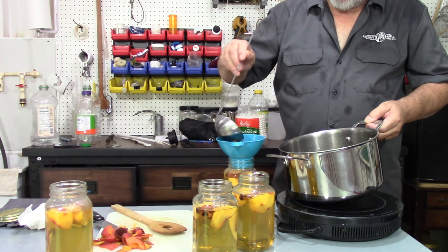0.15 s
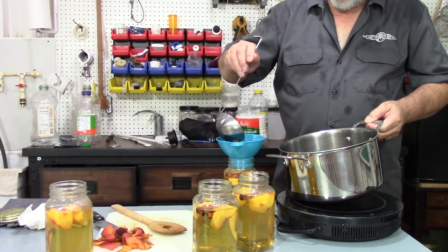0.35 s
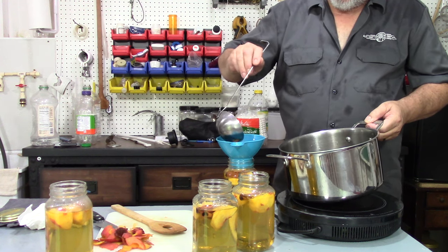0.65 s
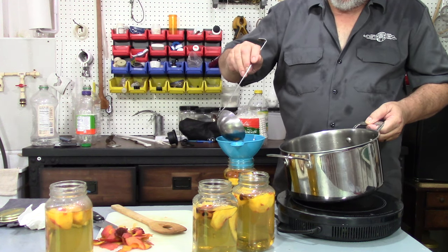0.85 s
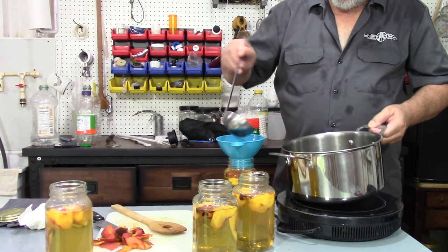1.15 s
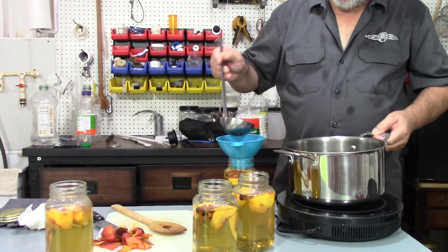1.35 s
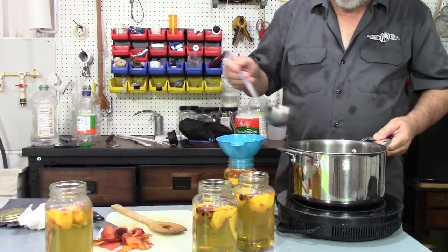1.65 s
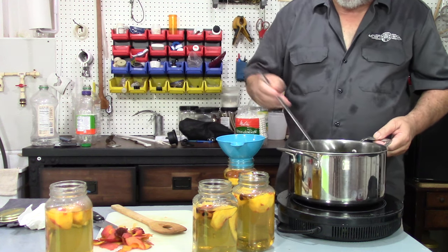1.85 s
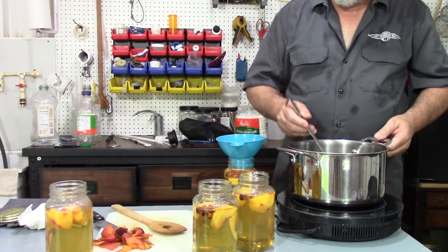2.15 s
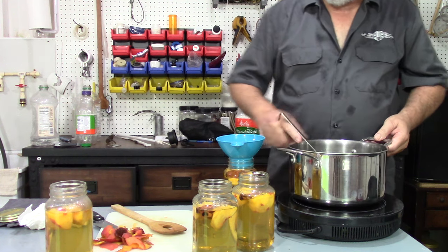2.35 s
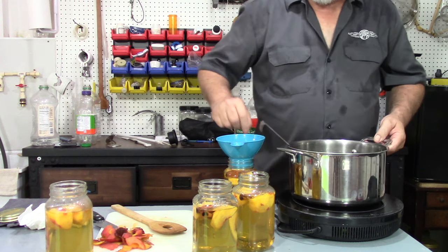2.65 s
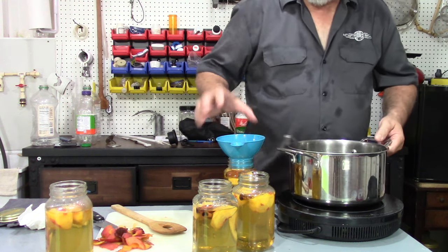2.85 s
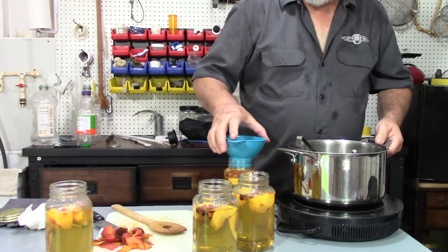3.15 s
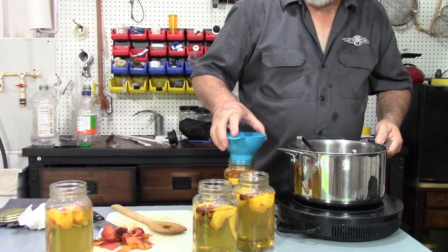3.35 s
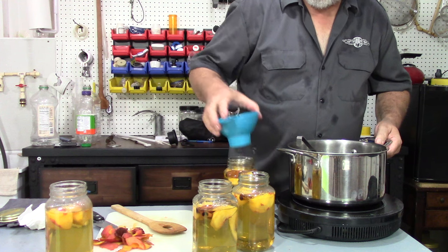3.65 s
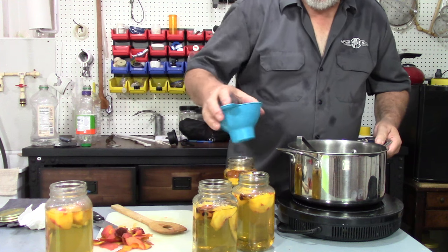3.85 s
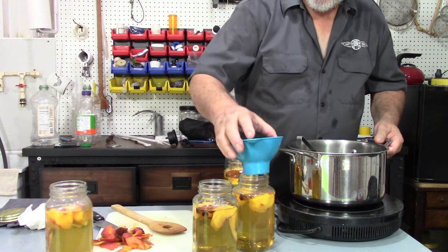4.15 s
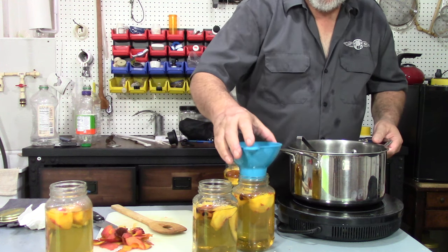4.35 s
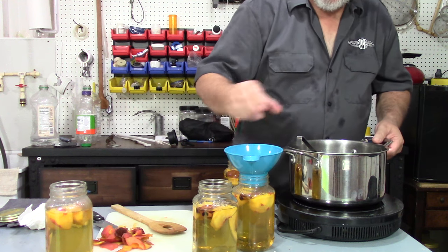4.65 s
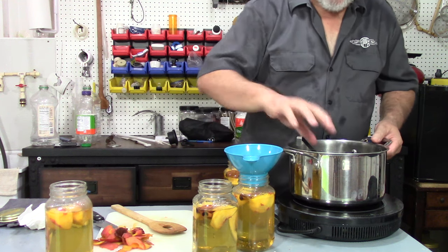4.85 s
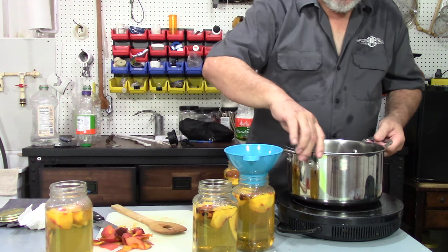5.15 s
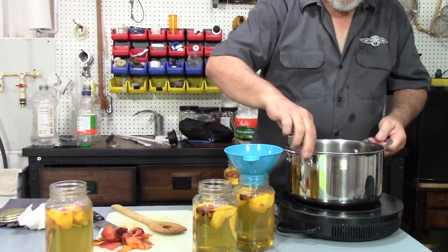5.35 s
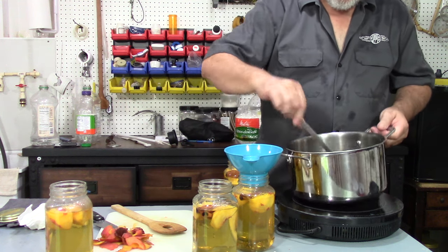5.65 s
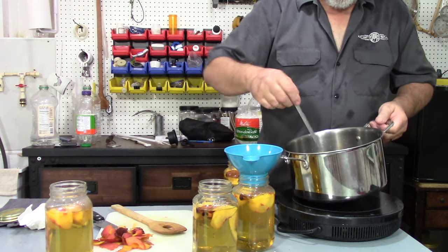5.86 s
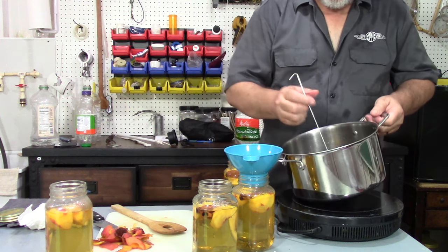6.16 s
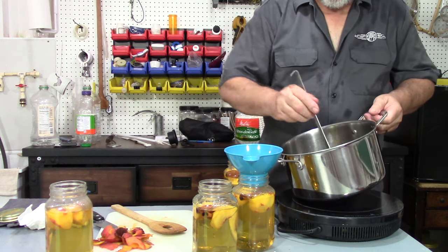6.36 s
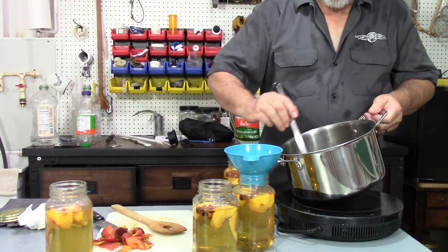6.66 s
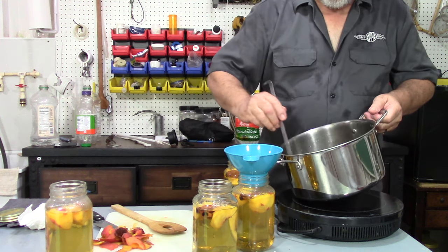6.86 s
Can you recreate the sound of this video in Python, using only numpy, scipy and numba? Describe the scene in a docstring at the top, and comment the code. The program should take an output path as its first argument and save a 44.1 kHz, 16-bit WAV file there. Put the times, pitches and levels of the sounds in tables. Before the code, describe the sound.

For the first two seconds, the last of a pour of syrup hisses and trickles faintly into a glass jar, with a few tiny metal ticks. At 2.1 seconds a steel pot is set down with a loud, ringing clang, the strongest sound. From 2.5 to 2.8 seconds a metal ladle drops in, clattering and scraping, then settles with a soft bump and tick by 3.4 seconds. At 4.1 seconds a funnel knocks hollowly on a jar's mouth, followed by four lighter taps until 4.5. After a short lull, the ladle scrapes grittily inside the pot from 5.3 seconds, clinking around 6 seconds, while the pot's ring rises slightly as it tips. A sharp clank comes at 6.4 seconds, with more clinks and scrapes from 6.7 to 7. Everything sounds close, in a small workshop with short reverberation and faint room tone.

```python
"""The last of a pour of syrup hisses away into a jar, whose glass and air sing under the splashes.
In a small workshop, the steel pot is set down; its ladle drops in, rocks and scrapes; a funnel knocks
on a jar's mouth. Then the pot is tipped and scooped: syrup leaving the wall lightens it and raises
most of its tones. Each blow is an impulse that sets damped modes ringing; scraping drives the same
modes with a gritty friction force. Faint room tone lies under it all."""
import sys
import numpy as np
from scipy import signal
from scipy.io import wavfile
from numba import njit

SR = 44100
rng = np.random.default_rng(int(sys.argv[2]) if len(sys.argv) > 2 else 0)


def transcribe(u):
    """Save the signal u as a 16-bit wav file named by the first command-line argument.

    u: samples, shape (n,) or (channels, n), limited to [-1, 1]; the rate is SR.
    q: integer samples, one column per channel.
    """
    v = np.clip(np.atleast_2d(u).T, -1, 1)
    q = np.round(v * 32767).astype(np.int16)
    wavfile.write(sys.argv[1], SR, q)


N = 309141

# blows on steel: t/s, tick level/dB, then level/dB at f/Hz = 170, 400, 1000, 2000, 4000, 8000
STEEL_BLOWS = [(0.122, -39, -63, -49, -53, -59.5, -54, -65), (0.417, -40, -61, -59, -63, -52, -66, -56),
               (0.896, -35.5, -63, -53, -63, -55.5, -61, -66), (1.499, -35.5, -55, -55, -72, -60, -57, -59),
               (2.104, 9, -46, -9.5, -16.5, -29.5, -29.5, -23),
               (2.531, -10, -60, -26, -18, -30, -12.5, -16), (2.68, -10, -52, -36, -21, -36, -19.5, -21.5),
               (2.786, -7, -45, -26.5, -25, -17.5, -14.5, -14),
               (3.021, -15, -20, -49.5, -46, -47, -51, -51), (3.289, -29, -52, -53, -46.5, -69, -75, -65.5),
               (5.332, -43.5, -44.5, -66, -65, -56, -54.5, -66), (5.946, -14, -58, -35, -59, -53, -38, -43),
               (6.093, -19, -53, -63, -51, -59, -36.5, -42), (6.294, -47, -62, -64, -76, -61, -51, -55),
               (6.424, 0.5, -48, -40.5, -23, -25, -23.5, -26.5),
               (6.727, -20, -69, -28, -19, -26, -24.5, -21.5),
               (6.753, -26, -46, -27.5, -28.5, -26, -29, -57), (6.889, -1, -65, -32, -45, -45, -31, -39)]
# knocks of the funnel on the jar's mouth: columns as for the blows
FUNNEL_KNOCKS = [(4.117, -5.5, -36, -19, -24.5, -43, -34, -47.5),
                 (4.209, -23, -33, -21.5, -33, -47, -41, -50), (4.312, -30, -53, -29, -38, -49, -35, -40),
                 (4.405, -18, -47, -33, -53, -64, -54, -46), (4.488, -35, -49, -48, -51, -60, -66.5, -69)]
# envelope of the pour: t/s, level/dB
POUR_LEVEL = [(0.0, -52), (0.2, -53), (1.48, -59), (1.85, -64.5), (2.1, -52.5)]
# likeness of left and right in the pour's hiss and the room tone: f/Hz, coherence
AIR_COHERENCE = [(60, 0.96), (180, 0.96), (550, 0.81), (1650, 0.4), (4970, 0.98), (15000, 0.31)]


def pot_and_ladle(blow_db=-6, rub_db=-30, scatter_db=0.5, chatter_db=-28, chatter_s=0.036):
    """Modal superposition: blows and friction drive each mode as strongly as the contact place allows."""
    # modes of the pot, then the ladle: f/Hz standing, f/Hz tipped
    mode_hz = [(320, 366), (371, 380), (425, 444), (579, 633), (751, 694), (783, 794), (956, 947),
               (1015, 1190), (1262, 1392), (1537, 1758), (1814, 2011), (2134, 2428), (2309, 2509),
               (2783, 3122), (1440, 1440), (1682, 1682), (1803, 1803), (2188, 2188), (2705, 2705),
               (3095, 3095), (3276, 3276), (3373, 3373), (3475, 3475), (3556, 3556), (3663, 3663),
               (3811, 3811), (3959, 3959), (4161, 4161), (4414, 4414), (5230, 5230), (5486, 5486),
               (6223, 6223), (6350, 6350), (6434, 6434)]
    # the same modes: T60/s, then coupling level/dB at places 0 to 4
    mode_response = [(0.59, 4.5, 3, 4.5, 1, -4.5), (0.4, -9.5, -7, -4, 0, -6.5),
                     (0.5, -4.0, -4, 2, -11, 4.5), (0.32, -5, -13, -2, -14.5, -8),
                     (0.2, -20, -16.5, 1, -15, -2), (0.41, -3.5, -15.5, -9.0, -27, -5),
                     (0.4, -7, -4.5, -8.5, -9.5, -3), (0.24, -0.5, 3.5, -1, -16, 10),
                     (0.42, -11.5, -9, 5.5, -18, 1), (0.24, -3, -2.5, 9, -14.0, 6),
                     (0.24, -9, -3.5, 4, -1, 0), (0.19, -16, 0.5, 0, -17, 0.5),
                     (0.2, -7.5, -20, -5.0, -23, -17), (0.14, -4.5, -20.5, -2, -16.0, -3),
                     (0.31, -26, -0.5, -12, -1.5, -3.5), (0.19, -9.0, -6, -3, 8, -5),
                     (0.18, -13, 2, -22, 5.5, -4), (0.18, -11, -7.5, -24.0, 2.5, -17),
                     (0.24, -5, -12, -22, 5, -10), (0.39, -8, -1.0, -13, -7, -4.5),
                     (0.24, -17, -6, -2.5, -7.5, -9), (0.22, -3, 5, -17.0, 1, -5),
                     (0.13, -12.0, 1, -8, 1, -7), (0.2, -5.0, 0.5, -21.0, 9, 1),
                     (0.085, -8, 1.5, -20, -15, -3), (0.17, -7.5, -6, -6, 0.5, -17),
                     (0.14, -6, -9, -7, 0, -9), (0.13, -9, -8.5, -15, -1.5, -3), (0.1, 0, -6, -10, 2.5, -8),
                     (0.14, -13, -11.5, -12.0, -9, -11), (0.18, -11, -7.5, -7, -13, -6.5),
                     (0.11, -4.5, -2, -4, -10, -10), (0.16, -5.0, -2.5, -10, -7.0, -6),
                     (0.14, -1, -5, -17, -7, -2)]
    # contact: from t/s, place (0 pot base, 1 loose ladle, 2 pot wall, 3 ladle bowl, 4 stirring)
    contacts = [(0, 4), (2, 0), (2.35, 1), (5, 4), (6.4, 3), (6.72, 2), (6.86, 3)]
    # tilt of the pot: t/s, tilt (0 standing, 1 tipped)
    tilt_path = [(0, 0.25), (5.6, 0.02), (5.75, 0.2), (5.9, 0.61), (5.999, 0.88), (6.12, 0.94), (7.01, 1)]
    blows, t = np.array(STEEL_BLOWS), np.arange(N) / SR
    tilt = np.interp(t, *np.transpose(tilt_path))
    starts, places = np.transpose(contacts)
    place = places[np.searchsorted(starts, t + .01, side="right") - 1].astype(int)
    roughness = grit(per_s=900, spread_db=2.0)
    scatter = rng.normal(0, scatter_db, (len(blows), len(mode_hz)))
    out = np.zeros(N)
    for k, ((standing, tipped), (t60, *place_db)) in enumerate(zip(mode_hz, mode_response)):
        kicks = impulses(blows, blow_db + zone_db(blows[:, 2:], standing) + scatter[:, k]) * (-1) ** k
        chatter = amp(chatter_db) * decay(kicks, np.exp(-1 / (chatter_s * SR)))  # the ladle rattles on
        force = kicks + (chatter + amp(rub_db) * rubbing(standing)) * np.roll(roughness, 37 * k)
        hz = standing + tilt * (tipped - standing)
        out += ring(force * amp(place_db)[place], hz, damping(t60), SR)
    return out


def rubbing(hz):
    """Sliding friction of steel on steel: its envelope at hz, zero between strokes."""
    # one list per stroke: t/s, then level/dB at f/Hz = 400, 1000, 2000, 4000, 8000
    strokes = [
        [(2.36, -60, -49, -77, -65, -63), (2.454, -43.5, -41, -57, -57, -42), (2.52, -52, -63, -70, -71, -48)],
        [(2.58, -37, -29.5, -35, -26, -32), (2.768, -37, -43.5, -43, -36, -34), (2.78, -27, -29, -31, -23, -34)],
        [(3.1, -56, -65, -71, -72, -76), (3.262, -57.5, -73, -85, -90, -91), (3.31, -47, -57.5, -78, -76, -85),
         (3.42, -84, -82, -71, -71, -82)],
        [(5.3, -73, -75, -77, -81, -75), (5.33, -61.5, -72.5, -71, -63, -59),
         (5.584, -42.5, -48, -49.5, -44, -39), (5.722, -68, -57.5, -63, -51, -41),
         (5.826, -37.5, -57, -52.5, -51, -64), (6.002, -57, -56, -63, -55, -69.5),
         (6.172, -59, -75.5, -46, -71, -69), (6.25, -83, -69, -84, -76, -75)],
        [(6.62, -64, -53, -58, -70, -66), (6.696, -64, -42, -53, -38.5, -39), (6.72, -46, -59, -62, -57, -40)],
        [(6.82, -33.5, -43, -49, -36, -51), (6.92, -62, -47, -51, -34.5, -34), (7.01, -60, -69, -59, -57, -64)],
    ]
    out = np.zeros(N)
    for stroke in map(np.array, strokes):
        span = np.arange(int(stroke[0, 0] * SR), min(int(stroke[-1, 0] * SR), N))
        out[span] = amp(np.interp(span / SR, stroke[:, 0], zone_db(stroke[:, 1:], hz)))
    return out


def funnel(knock_db=-1, scatter_db=0.97):
    """Free vibration: funnel, jar and bench ring together after each knock."""
    # their joint modes: f/Hz, T60/s, level/dB
    modes = [(186.5, 0.35, -5), (314.6, 0.58, -0.5), (476, 0.19, -13.5), (590, 0.1, -5), (840, 0.68, -14),
             (952, 0.16, -5), (1074, 0.13, -4.5), (1337, 0.55, -15), (2370, 0.12, -3), (2760, 0.046, 6),
             (3270, .2, -7), (3390, 0.18, 4), (3504, 0.2, -9), (3570, 0.089, 4.5), (5070, 0.22, -7.5),
             (6660, 0.061, 0)]
    knocks, out = np.array(FUNNEL_KNOCKS), np.zeros(N)
    for k, (hz, t60, db) in enumerate(modes):
        levels = knock_db + db + zone_db(knocks[:, 2:], hz) + rng.normal(0, scatter_db, len(knocks))
        out += ring(impulses(knocks, levels) * (-1) ** k, np.full(N, float(hz)), damping(t60), SR)
    return out


def contact_ticks(tick_db=-12, tick_hz=3040.0, t60=0.0017):
    """Contact transient: every blow and knock opens with one heavily damped oscillation."""
    hits = np.array(STEEL_BLOWS + FUNNEL_KNOCKS)
    return ring(impulses(hits, tick_db + hits[:, 1]), np.full(N, tick_hz), damping(t60), SR)


def dense_modes(blow_db=-12, rub_db=-7, crack_db=2, crack_s=0.013):
    """Modal overlap: unresolved modes act as noise, a crack and tail when struck, a hiss when rubbed."""
    # these modes with the room's tail: f/Hz, spectrum level/dB, T60/s
    spectrum = [(110, -20, .3), (182, -5.5, 0.74), (314, -2.5, 0.97), (590, 13.5, 0.69), (1121, 9, 0.61),
                (2420, 12.5, 0.5), (4800, 5.5, 0.55), (8600, 9.5, .32), (11230, -11.5, 0.41),
                (15500, -24.5, .25)]
    # likeness of left and right: f/Hz, coherence
    coherence = [(200, 0.98), (1000, 1), (3000, .94), (12000, 0.98)]
    hits, out = np.array(STEEL_BLOWS + FUNNEL_KNOCKS), 0
    for hz, noise in noise_bands(coherence, skip=7):
        kicks = impulses(hits, blow_db + zone_db(hits[:, 2:], hz))
        tail = decay(kicks, damping(at_hz(spectrum, hz, column=2)))
        crack = amp(crack_db) * decay(kicks, np.exp(-1 / (crack_s * SR)))
        out += amp(at_hz(spectrum, hz)) * (tail + crack + amp(rub_db) * rubbing(hz)) * noise
    return out


def pour_hiss(level_db=2, splutter_db=1.0):
    """Amplitude-modulated noise: the pour's bands surge together and splutter separately."""
    # colour of the hiss: f/Hz, spectrum level/dB
    spectrum = [(82, -36), (140, -1.5), (267, -4), (344, -8.5), (435, 1.5), (572, -14), (1850, -15),
                (2080, -16.5), (2430, -18), (5980, -7), (15000, -53.5)]
    surge, hiss = 0.42 * drift(5.0), 0
    for hz, noise in noise_bands(AIR_COHERENCE):
        hiss += amp(at_hz(spectrum, hz) + splutter_db * (surge + drift(25.0))) * noise
    return pour_envelope(level_db) * hiss / hiss.std()


def singing_jar(drops_per_s=400, level_db=-3):
    """Resonance: random splashes excite the jar's glass and air in short, uneven notes."""
    # f/Hz, bandwidth/Hz, level/dB
    resonances = [(2058, 34, -4.5), (3055, 160, 2.5), (3560, 160, 0.5), (4040, 170, 4), (4630, 130, 5.5),
                  (4900, 64, -3.5), (5890, 53, -11), (6560, 82, 0), (6710, 96, -5)]
    notes = 0
    for hz, width, db in resonances:
        splashes = grit(drops_per_s, spread_db=4.0)
        note = ring(splashes, np.full(N, float(hz)), np.exp(-np.pi * width / SR), SR)
        notes += amp(db) * np.sqrt(width) * note
    return pour_envelope(level_db) * notes / notes.std()


def reverberation(sound, t60=0.38, level_db=-5):
    """Diffuse reflection: convolution with exponentially decaying noise, different at each ear."""
    t = np.arange(int(.4 * SR)) / SR
    mid, side = rng.standard_normal((2, len(t))) * amp(-60 * t / t60) * (t > .004)
    response = mid + 0.45 * np.diff(side, prepend=0) * [[1], [-1]]
    response /= np.linalg.norm(response[0])
    return amp(level_db) * signal.fftconvolve(sound[None], response, axes=1)[:, :N]


def room_tone(level_db=-55.5, waver_db=1.5):
    """Ambient noise: a steady floor whose bands waver independently."""
    # colour of the floor: f/Hz, spectrum level/dB
    spectrum = [(20, -49), (35, -26), (58, -7), (85, 1.5), (140, -3), (255, -1.5), (420, -3.5), (750, -9.5),
                (1300, -12.5), (3000, -19), (6000, -21), (9000, -30), (12000, -31), (16000, -56.5)]
    air = 0
    for hz, noise in noise_bands(AIR_COHERENCE):
        air += amp(at_hz(spectrum, hz) + waver_db * drift(4.0)) * noise
    return amp(level_db) * air / air.std()


def amp(db):
    """Level to amplitude ratio."""
    return 10 ** (np.asarray(db) / 20)


def damping(t60):
    """Amplitude ratio per sample for a fall of 60 dB in t60 seconds."""
    return amp(-60 / (t60 * SR))


def decay(kicks, r):
    """Exponential decay after each impulse, by the ratio r per sample."""
    return signal.lfilter([1], [1, -r], kicks + 1e-12)


def pour_envelope(offset_db):
    """Amplitude of the pour, silent once it ends."""
    return amp(offset_db + np.interp(np.arange(N) / SR, *np.transpose(POUR_LEVEL), right=-120))


def at_hz(table, hz, column=1):
    """Interpolates a spectrum on a log-frequency axis."""
    table = np.array(table)
    return np.interp(np.log(hz), np.log(table[:, 0]), table[:, column])


def zone_db(levels, hz):
    """Interpolates each row of zone levels at hz; shorter rows lack the lowest zone."""
    # zone centres: f/Hz
    centres = [170, 400, 1000, 2000, 4000, 8000]
    return np.array([np.interp(np.log(hz), np.log(centres[-len(row):]), row) for row in levels])


def impulses(hits, levels_db):
    """Impulsive force: one sample at the time of each hit."""
    force = np.full(N, 1e-18)
    force[(hits[:, 0] * SR).astype(int)] = amp(levels_db)
    return force


def grit(per_s, spread_db):
    """Shot noise: random clicks of uneven size, with unit variance."""
    clicks = (rng.random(N) < per_s / SR) * amp(spread_db * np.minimum(rng.exponential(1, N), 4))
    clicks *= rng.choice([-1, 1], N)
    return clicks / clicks.std()


def drift(rate_hz, step=40):
    """Low-pass noise: a slow fluctuation of unit variance."""
    r = np.exp(-2 * np.pi * rate_hz * step / SR)
    slow = signal.lfilter([1], [1, -2 * r, r * r], rng.standard_normal(N // step + 2002))[2000:]
    return np.interp(np.arange(N) / step, np.arange(len(slow)), slow / slow.std())


def noise_bands(coherence, skip=0):
    """Partly coherent stereo noise in third octaves from band number skip up: yields (f/Hz, noise)."""
    edges, white = 22 * 2 ** (np.arange(skip, 30) / 3), rng.standard_normal((2, 2, N))
    for k, (low, high) in enumerate(zip(edges, edges[1:])):
        band = signal.butter(2, [low, high], "band", fs=SR, output="sos")
        mid, side = signal.sosfilt(band, white[k % 2])
        hz = np.sqrt(low * high)
        alike = at_hz(coherence, hz)
        yield hz, np.sqrt(1 + alike) * mid + np.sqrt(1 - alike) * side * [[1], [-1]]


@njit
def ring(force, hz, r, sr):
    """Damped oscillator whose frequency may glide; a unit impulse rings with amplitude 1."""
    out, feedback, gain = np.zeros(len(force)), 0., 0.
    for i in range(2, len(force)):
        if i % 64 == 2:
            angle = 2 * np.pi * hz[i] / sr
            feedback, gain = 2 * r * np.cos(angle), np.sin(angle)
        out[i] = gain * force[i - 1] + feedback * out[i - 1] - r * r * out[i - 2]
    return out


def scene(bass_cut_hz=150, right_db=0.11):
    """Superposition of the ringing bodies, which radiate no deep bass, their room and the noises."""
    bodies = pot_and_ladle() + funnel() + contact_ticks() + singing_jar()
    direct = signal.sosfilt(signal.butter(4, bass_cut_hz, "high", fs=SR, output="sos"), bodies)
    mix = direct + reverberation(direct) + dense_modes() + pour_hiss() + room_tone()
    return mix * amp([[-right_db / 2], [right_db / 2]])


def record(dry, stop_hz=16600):
    """Soft saturation rounds the peaks; a steep low-pass cuts the highest treble."""
    return signal.sosfilt(signal.cheby2(14, 70, stop_hz, fs=SR, output="sos"), np.tanh(dry))


dry = scene()
out = record(dry)
transcribe(out)
```